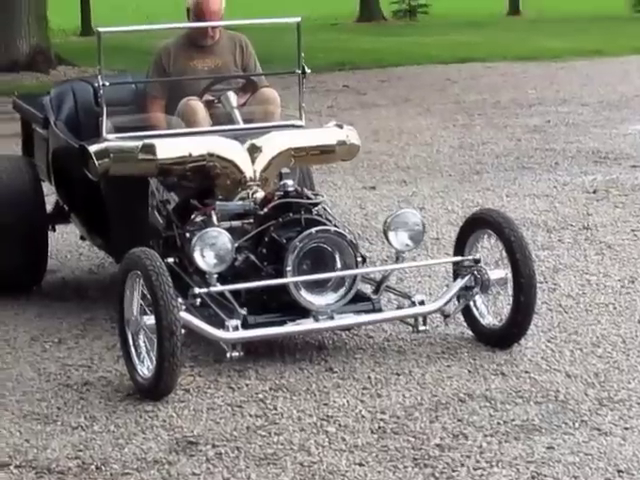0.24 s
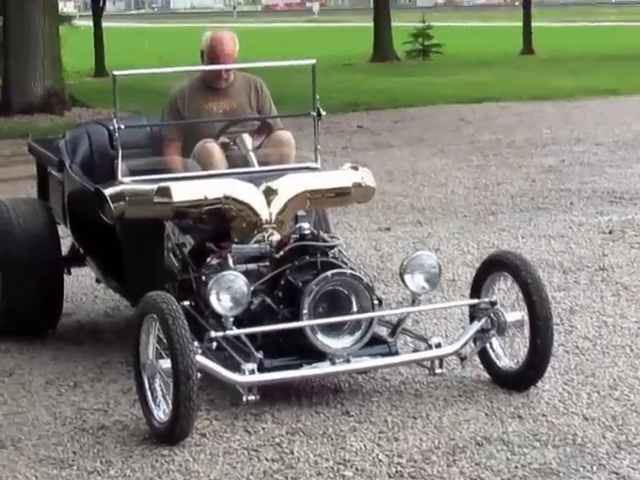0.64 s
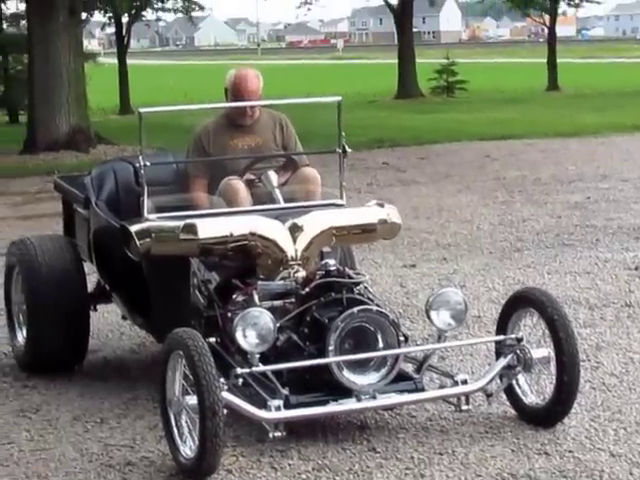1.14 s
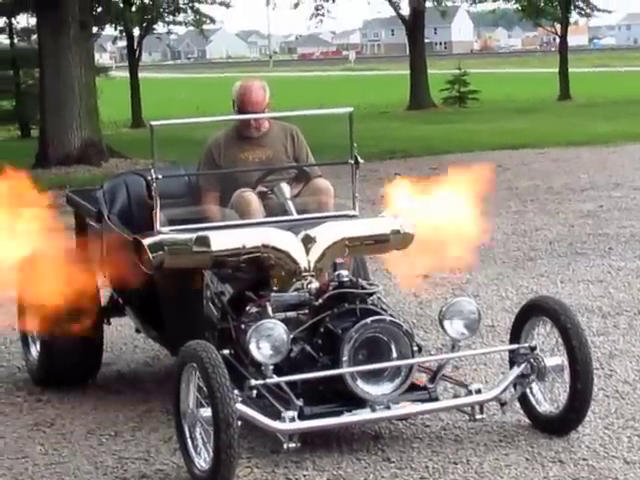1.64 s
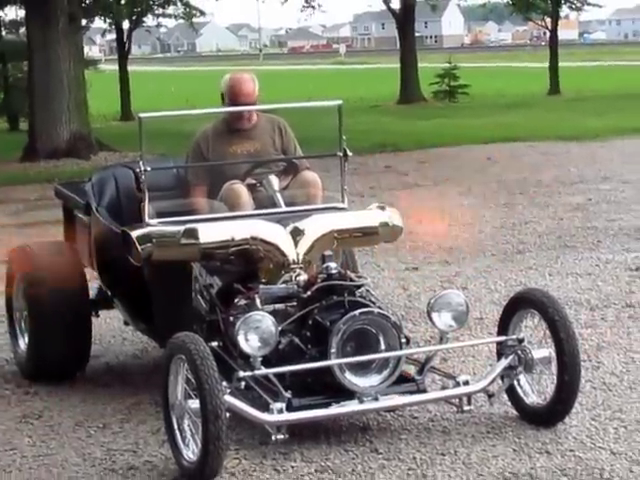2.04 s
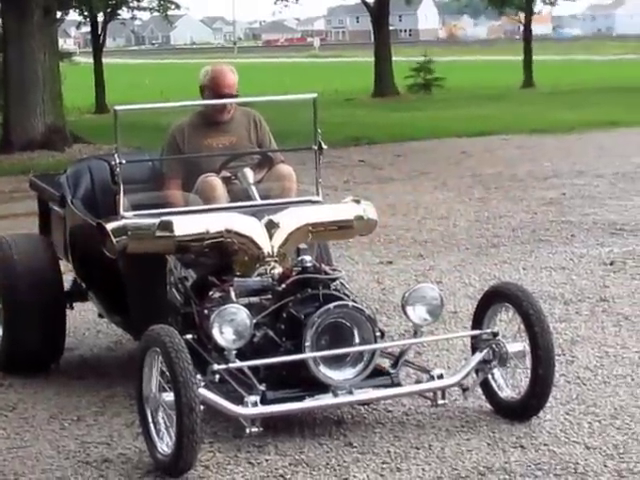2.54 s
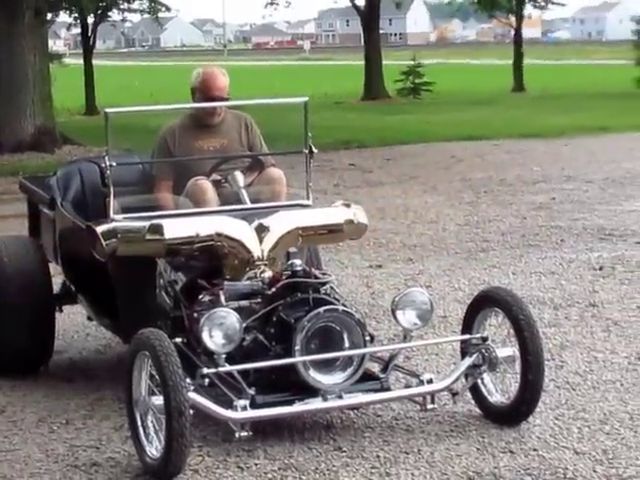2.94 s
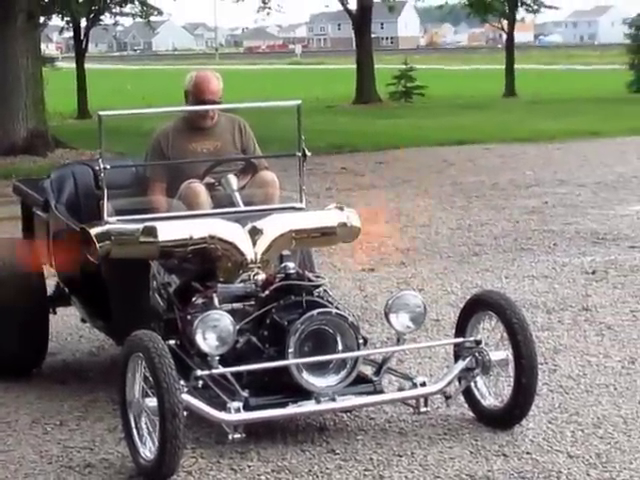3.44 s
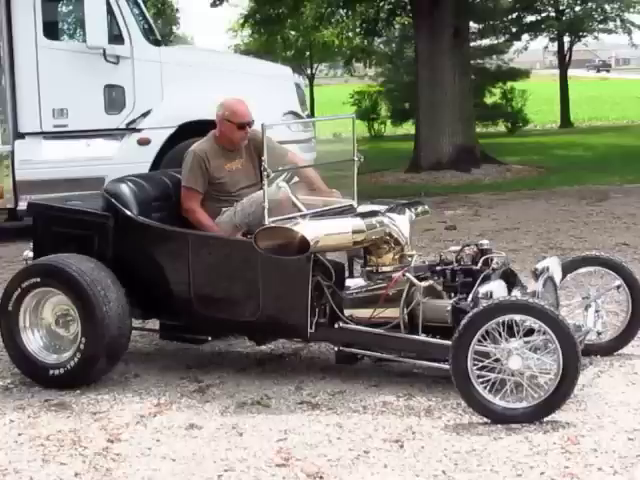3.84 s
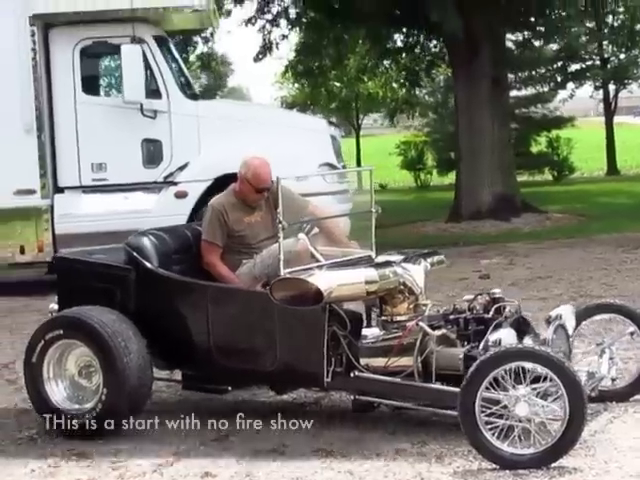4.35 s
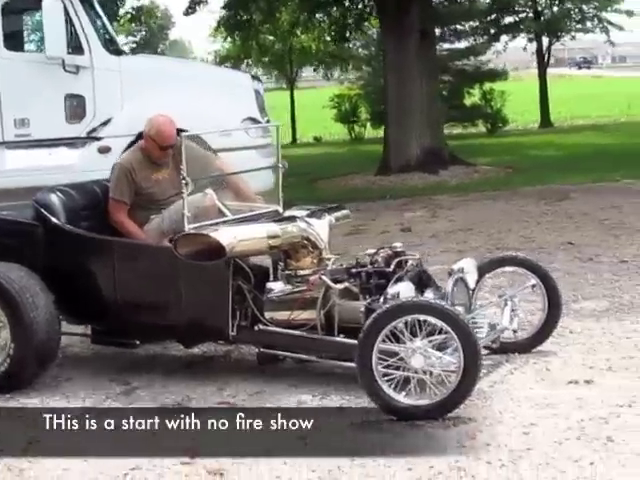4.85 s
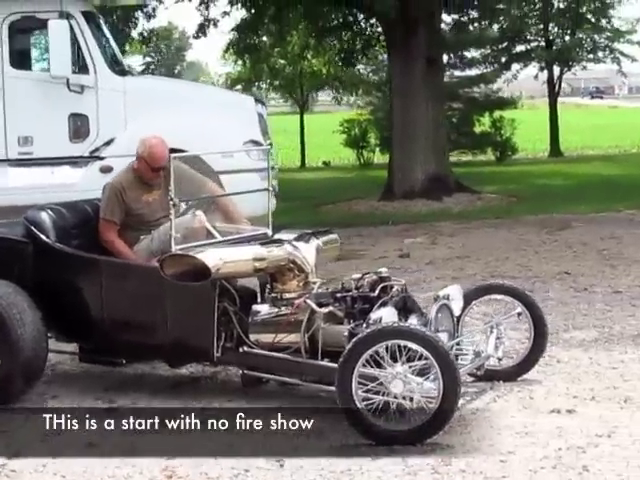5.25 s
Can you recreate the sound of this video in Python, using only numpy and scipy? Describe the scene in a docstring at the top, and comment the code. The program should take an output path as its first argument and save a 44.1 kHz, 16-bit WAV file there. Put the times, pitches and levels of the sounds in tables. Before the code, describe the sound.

A small turbine engine whines over a booming exhaust and flares with fluttering flames, then gives way to clicks and a starter whirring up.

```python
"""Outdoors on gravel, a small gas turbine runs in an open hot rod. Its spinning compressor blades whine and
slow down over a booming exhaust and a rush of gas. At 1.5 s the fuel lights, the pipes drone, and the whine
flutters with the flames as it climbs again. At 3.9 s the scene changes to a quiet yard: a few clicks, then the
starter clacks in and its gear teeth whir faster and faster."""
import sys
import numpy as np
from scipy import signal
from scipy.fft import rfft, irfft
from scipy.io import wavfile
from scipy.ndimage import uniform_filter1d

SR = 44100
rng = np.random.default_rng(int(sys.argv[2]) if len(sys.argv) > 2 else 0)


def generate_wav(sig):
    """Save sig (samples, or channels by samples) to the path in sys.argv[1] as 16-bit PCM at SR."""
    pcm = np.round(np.clip(np.atleast_2d(sig).T, -1, 1) * 32767).astype(np.int16)
    wavfile.write(sys.argv[1], SR, pcm)


N = 242991
T = np.arange(N) / SR
HZ = np.fft.rfftfreq(N, 1 / SR)
LIGHT_S, LIGHT_RISE_S = 1.465, .1  # when the fuel lights, and how long it takes

# How fast the compressor blades pass. Each row: time in seconds, rate in Hz.
BLADE_RATE = [(0.0, 2715), (0.25, 2600), (0.5, 2516), (1.0, 2368), (1.45, 2262), (1.8, 2364), (2.0, 2404),
              (2.55, 2519), (2.9, 2556), (3.3, 2633), (3.45, 2697), (3.9, 2905)]
# How well the intake lets the whine out. Each row: frequency in Hz, level in dB.
INTAKE_RESPONSE = [(2250, -29), (2480, -31.5), (2680, -28.3), (2860, -21), (4480, -34), (4650, -24.3),
                   (5800, -24), (6800, -43), (7120, -38.5), (7350, -23.3), (7800, -26.5), (8150, -21.7),
                   (8700, -27), (9100, -39), (10400, -35.5), (11400, -42), (12100, -38), (13200, -36.5),
                   (13700, -42), (15000, -54)]
# One tone of the whine swells or sinks. Each row: time in seconds, harmonic number, change in dB,
# half length in seconds.
WHINE_SWELLS = [(.33, 1, 6.5, .1), (.1, 1, -6, .06), (.73, 2, -10, .025), (1.15, 2, 2.5, .1),
                (1.56, 2, -5, .11), (2.58, 3, 5, .14), (3.2, 2, -3, .15), (3.53, 1, 3, .1),
                (3.785, 1, 3.5, .03)]
# The tone colour of each noise. Each row: frequency in Hz, relative level in dB.
BOOM_COLOUR = [(40, -70), (85, -17), (115, -12), (138, -2), (152, -1), (175, -8.5), (215, -13.5),
               (290, -30), (420, -30.5), (560, -36), (680, -29.5), (850, -36.5), (2000, -60.5)]
RUMBLE_COLOUR = [(15, -22), (30, -19), (52, 0), (80, 3.5), (120, -2.5), (220, -4), (300, -12), (450, -17),
                 (900, -32), (2000, -63.5)]
ROAR_COLOUR = [(100, 4.5), (400, -2), (700, -3.7), (1050, -2.8), (1450, 3.5), (2000, 0.5), (2700, 5.3),
               (3300, -3.5), (6000, -33.5)]
HISS_COLOUR = [(1200, -19), (2500, -11), (3700, .6), (5500, 3.3), (6700, -1.7), (8500, 2.2), (11000, -3),
               (13000, -2.5), (14500, -15), (16000, -50)]
YARD_COLOUR = [(15, -26), (30, 2.5), (110, 3), (200, -3), (360, -9), (560, -11.5), (1200, -14), (1800, -17),
               (2600, -21.5), (3300, -21.5), (4200, -27.5), (5600, -29), (9700, -37.5), (15000, -46.5)]
RATTLE_COLOUR = [(200, -22), (350, -9.5), (520, 3), (700, -4), (900, 3.5), (1250, -1.5), (2000, -0.5),
                 (2800, -5.5), (3300, -13), (4300, -13.5), (6000, -18), (9500, -13.5), (12000, -24.5),
                 (15000, -43)]
# The boom surges. Each row: time in seconds, pitch in Hz, level in dB, half length in seconds.
BOOM_SURGES = [(0.131, 146.5, -7.5, 0.0072), (0.168, 142, -9.5, 0.0066), (0.209, 155.7, -10, 0.0064),
               (0.239, 140, -7.5, 0.00715), (0.46, 148.9, -6.5, 0.01515), (0.787, 141, -11, 0.0109),
               (0.847, 140.7, -9.5, 0.0149), (0.917, 159.3, -8, 0.0148), (1.246, 165.1, -10, 0.012),
               (1.471, 152.9, -11, 0.0092), (1.504, 123.2, -8, 0.0108)]
# The boom sags. Each row: time in seconds, change in dB.
BOOM_LULLS = [(0.351, -5.5), (.54, -2.5), (.675, -5), (1.14, -4.5), (1.33, -2.5), (3.01, -4.5)]
# Bursts of flame. Each row: start and end in seconds, extra whine flutter in radians,
# rumble boost in dB, boom loss in dB.
FLAME_BURSTS = [(1.47, 1.842, .27, 10.8, 14.5), (1.838, 2.48, .31, 8, 8), (2.72, 2.95, .36, 4.5, -1),
                (3.34, 3.61, 0.425, 5, 11.5), (3.7, 3.95, 0.359, 3.5, 10)]
# The flames spit. Each row: time in seconds, boost to the rush in dB, half length in seconds.
FLAME_SPITS = [(1.539, 0, 0.0035), (1.722, 2.5, 0.0084), (1.778, 1, 0.0043), (2.007, 6, 0.0131),
               (2.056, 4.5, 0.01), (2.18, 3, 0.013), (2.211, 11.5, 0.00343), (2.274, 3.5, 0.0039),
               (2.314, 6, 0.0052)]
# How the exhaust pipes, engine mount and gear case ring. # Each row: pitch in Hz, width in Hz between the half-
# power points, relative strength in dB.
PIPE_MODES = [(118, 22, 0), (254, 22, -2.5), (425, 36, -13)]
MOUNT_MODES = [(874, 70, -7), (1170, 300, -1.5), (1760, 150, -6), (1987, 300, 2), (2750, 300, 3.5),
               (3450, 150, -8), (4350, 450, 1), (5100, 600, -3), (7410, 1220, -7.5)]
CASE_MODES = [(352.6, 25, 1.5), (828.7, 15.7, 6.5), (926, 52, -6.5), (1848, 19, 1), (1980, 31.5, 5.5),
              (2085, 41, -5), (2744, 54, -2.5), (2890, 37, -20), (4040, 105, -11)]
# Knocks, a puff of air and the starter's clack. Each row: start in seconds, level in dB, centre in Hz,
# width in octaves, seconds for the crack to fall 60 dB, tail level against the crack in dB,
# seconds for the tail to fall 60 dB, share of mount ringing from 0 to 1.
KNOCKS = [(4.4588, -18.5, 1520, 0.42, 0.034, -19.5, 0.42, 0.1),
          (4.46, -34.5, 7200, .9, 0.0255, -6, 0.6, 0.58), (4.4995, -33, 3100, 0.55, 0.038, -6, 0.22, 0.1),
          (4.7316, -27, 6700, 0.7, 0.0305, -4, 0.357, 0.03),
          (4.8797, -14.7, 7000, 0.54, 0.0125, -17.5, 0.46, 0.1),
          (4.9150, -11.7, 4450, 0.7, 0.0715, -9, 0.42, .85), (4.965, -39, 190, 1.0, 0.29, 1, 0.81, .02)]
# Light ticks. Each row: start in seconds, level in dB.
LIGHT_TICKS = [(3.951, -23), (3.9949, -24.2), (4.0144, -32), (4.0587, -20.5), (4.124, -36), (4.6025, -29)]
# The sound all ticks share: the last six columns of a knock.
TICK_SOUND = (5000, .62, .006, -27, 0.18, 0.08)
# How loud the starter is. Each row: time in seconds, level in dB.
STARTER_LOUDNESS = [(4.925, -32), (4.98, -38), (5.1, -38), (5.2, -32.5), (5.3, -31.5), (5.4, -28),
                    (5.52, -28.5)]
# How fast its gear teeth meet. Each row: time in seconds, rate in Hz.
TOOTH_RATE = [(4.92, 246), (5.05, 596), (5.2, 790), (5.33, 880), (5.52, 975)]
# Which side a sound leans to. Each row: frequency in Hz, left minus right in dB.
TURBINE_BALANCE = [(60, 4), (110, 1), (200, 0.0), (380, -1.5), (700, 0.0), (1290, -2.5), (2380, -4),
                   (4400, 0.5), (8120, 4), (15000, -3)]
YARD_BALANCE = [(60, 3.5), (110, -0.5), (200, 0.5), (380, -1), (700, -1.5), (1290, -2.5), (2380, -3.0),
                (4400, 2), (8120, 1), (15000, 0.5)]
# How far the engine's left side runs ahead. Each row: frequency in Hz, phase lead in radians.
LEFT_LEAD = [(30, -1.24), (75, -0.94), (150, -0.4), (330, 0.21), (1300, -0.34), (4000, 0.086)]
# How alike left and right are. Each row: frequency in Hz, likeness from 0 to 1.
TURBINE_LIKENESS = [(50, 0.875), (130, 1), (300, 0.822), (700, 0.713), (2000, 0.794), (12000, 0.777)]
YARD_LIKENESS = [(50, 0.25), (150, 0.55), (700, 0.7), (1500, 0.75), (3000, 0.338), (12000, 0.356)]
# The bass cut after the microphone. Each row: frequency in Hz, gain in dB.
BASS_CUT = [(60, -9), (160, -5.5), (450, -2.5), (1000, 2)]


def amp(db):
    """Turns decibels into a gain."""
    return 10 ** (np.asarray(db) / 20)


def unit(x):
    """Scales a signal to an average (rms) strength of 1."""
    return x / np.sqrt(np.mean(x ** 2) + 1e-20)


def over_time(rows):
    """Joins a table's points into a value for every sample."""
    times, values = np.transpose(rows)
    return np.interp(T, times, values)


def over_hz(rows):
    """Joins a table's points into a value for every frequency."""
    hz, values = np.transpose(rows)
    return np.interp(np.log(HZ + 1), np.log(hz + 1), values)


def bell(s, half_length):
    """A smooth swell of height 1 around one moment."""
    return np.exp(-((T - s) / half_length) ** 2)


def ramp(start, length):
    """Rises from 0 to 1 and stays there."""
    return np.clip((T - start) / length, 0, 1)


def band(hz, octaves):
    """A bell-shaped band of frequencies."""
    return np.exp(-.5 * (np.log2((HZ + 1) / hz) / octaves) ** 2)


def wobble(hz, octaves):
    """A random wiggle of strength 1 around one rate."""
    return unit(irfft(rfft(rng.standard_normal(N)) * band(hz, octaves), N))


def noise(gain, likeness=TURBINE_LIKENESS):
    """Filtered stereo noise of strength 1, partly alike left and right."""
    common, apart = rfft(rng.standard_normal((2, N)))
    alike = np.clip(over_hz(likeness), 0, 1)
    mid, side = common * np.sqrt(1 + alike), apart * np.sqrt(1 - alike)
    return unit(irfft(np.array([mid + side, mid - side]) * gain, N))


def resonance(modes):
    """How strongly a ringing body answers each frequency."""
    return abs(sum(amp(db) / (1 + 2j * (HZ - hz) / width) for hz, width, db in modes))


def lean(x, balance, lead=((0, 0),)):
    """Tilts each frequency to the left or right, in level and in phase."""
    half = np.array([[.5], [-.5]])
    return irfft(rfft(x) * amp(half * over_hz(balance)) * np.exp(1j * half * over_hz(lead)), N)


def reflect(x, echo_db, spread_s, count=14):
    """Adds short echoes from ground and bodywork, different on each side."""
    delay = rng.random((2, count))
    taps = np.zeros((2, SR // 4))
    arrival = np.clip(delay * spread_s * SR, 1, SR // 4 - 1).astype(int)
    echoes = rng.choice([-1, 1], (2, count)) * np.exp(-2 * delay)
    np.put_along_axis(taps, arrival, echoes, 1)
    taps *= amp(echo_db) / np.linalg.norm(taps, axis=1, keepdims=True)
    taps[:, 0] = 1  # the direct sound
    return signal.oaconvolve(x[None], taps, axes=1)[:, :N] / np.linalg.norm(taps[0])


def compressor_whine(flame, duct, flutter):
    """Passing blades make a stack of tones; pressure swings shake them and swirling air roughens them."""
    blade_hz = over_time(BLADE_RATE)
    phase = 2 * np.pi * np.cumsum(blade_hz) / SR
    shaken = phase - flutter * flame + .049 * duct + .245 * wobble(7.2, .83)
    eddy_colour = 1 / (1 + (HZ / 130) ** 2) ** .78 / (1 + (HZ / 700) ** 4)
    out = np.zeros((2, N))
    for k in range(1, 7):  # harmonic k sounds at k times the blade rate
        db = np.interp(k * blade_hz, *np.transpose(INTAKE_RESPONSE))
        db -= .3 * k * ramp(LIGHT_S, LIGHT_RISE_S)
        db += sum(gain * bell(s, length) for s, harmonic, gain, length in WHINE_SWELLS if harmonic == k)
        throb = amp(3 * np.sqrt(k) * flutter * flame)  # higher tones throb more
        throb /= np.sqrt(uniform_filter1d(throb ** 2, size=4000))
        roughness = amp(-10) * (1 + 3.68 * np.sqrt(k) * flutter)
        eddies = (noise(eddy_colour) + 1j * noise(eddy_colour)) / np.sqrt(2)
        rough = (1 + roughness * eddies) / np.sqrt(1 + roughness ** 2)
        # moving hot air makes each tone shift between the ears and fade
        drift = np.outer([.5, -.5], .55 * wobble(3.3, 1))
        level = throb * amp(db + 1.4 * wobble(5.59, 1))
        out += level * np.sqrt(2) * (rough * np.exp(1j * (k * shaken + drift))).real
    accessory_gear = amp(-44) * np.sin(.571 * phase)  # driven by the same shaft
    return out + accessory_gear


def exhaust_boom(choke_db, steadiness=.606):
    """The exhaust duct sings near 150 Hz until flames choke it; in a surge it locks onto one pitch."""
    pressure = noise(amp(over_hz(BOOM_COLOUR)))
    strength = np.sqrt(abs(uniform_filter1d(pressure[0] ** 2, size=1400)) + 1e-6)
    lull_db = sum(db * bell(s, half_length=.032) for s, db in BOOM_LULLS)
    level_db = -16 - ramp(LIGHT_S, LIGHT_RISE_S) + lull_db - choke_db
    out = amp(level_db) * unit(pressure / strength ** steadiness)
    for s, hz, db, length in BOOM_SURGES:
        share = bell(s, length)
        tone = np.exp(2j * np.pi * hz * T)
        in_step = np.exp(1j * np.angle(np.sum(share * out[0] / tone)))  # lines up with the boom
        out = out * (1 - share) + share * amp(db) * np.sqrt(2) * (tone * in_step).real
    return out


def exhaust_rumble(boost_db):
    """A deep, lumpy noise that grows with each burst of flame."""
    lumps_db = 2.0642 * wobble(6.48, .97)
    return amp(-30 + boost_db + lumps_db) * noise(amp(over_hz(RUMBLE_COLOUR)))


def gas_rush(flame, duct, flutter):
    """Jet roar and intake hiss grow with the gas flow, pulse with the pressure and spit briefly."""
    pulse_db = (.5 + .244 * flutter) * flame + 1.18 * duct
    pulse_db += (.5 + 1.35 * flutter) * wobble(95, 1.58)
    gust_db = .64 * wobble(7.8, 1.61)
    spit_db = sum(db * bell(s, length) for s, db, length in FLAME_SPITS)
    lit, seconds_lit = ramp(LIGHT_S, LIGHT_RISE_S), np.maximum(T - LIGHT_S, 0)
    roar = amp(-34.5 + 4.5 * lit + 2 * seconds_lit) * noise(amp(over_hz(ROAR_COLOUR)))
    hiss = amp(-34 + 3 * lit + 1.9334 * seconds_lit) * noise(amp(over_hz(HISS_COLOUR)))
    return (roar + hiss) * amp(pulse_db + gust_db + spit_db)


def flame_throb():
    """The flame throbs at an uneven rate, with nearly constant strength."""
    swing = signal.hilbert(wobble(hz=48, octaves=.413))
    return unit(swing.real / (abs(swing) + .1) ** .59)


def flame_bursts(edge_s=.063, choke_lag_s=.03):
    """Each burst shakes the whine, boosts the rumble and, a moment later, usually chokes the boom."""
    flutter, boost_db, choke_db = sum(np.outer(effects, ramp(start, edge_s) - ramp(end, edge_s))
                                      for start, end, *effects in FLAME_BURSTS)
    steady_flutter = .03 + .14 * ramp(LIGHT_S, LIGHT_RISE_S)
    return steady_flutter + flutter, boost_db, np.interp(T - choke_lag_s, T, choke_db)


def pipe_drone(boost_db):
    """Once the fuel is lit, the flames make the exhaust pipes ring."""
    return amp(-30 + .45 * boost_db) * ramp(LIGHT_S, LIGHT_RISE_S) * noise(resonance(PIPE_MODES) ** 1.5)


def turbine():
    """The whole engine, its sounds tied together by the flames and the pressure in the duct."""
    flutter, boost_db, choke_db = flame_bursts()
    flame, boom = flame_throb(), exhaust_boom(choke_db)
    duct = unit(boom[0])
    exhaust = boom + exhaust_rumble(boost_db) + pipe_drone(boost_db)
    engine = exhaust + gas_rush(flame, duct, flutter) + compressor_whine(flame, duct, flutter)
    return lean(engine, TURBINE_BALANCE, LEFT_LEAD)


def yard_noise():
    """The soft, low background of the open yard."""
    return amp(-36.5) * noise(amp(over_hz(YARD_COLOUR)), YARD_LIKENESS)


def clicks(rise_s=.0002533, contact_db=3):
    """Each click is a sharp contact, a short crack and a softer tail; some ring the engine mount."""
    out = np.zeros((2, N))
    mount = unit(resonance(MOUNT_MODES) ** 1.47)
    ticks = [(*tick, *TICK_SOUND) for tick in LIGHT_TICKS]
    for s, db, hz, octaves, crack_s, tail_db, tail_s, ring in ticks + list(KNOCKS):
        age = np.maximum(T - s, 0)
        decay = np.hypot(amp(-60 * age / crack_s), amp(tail_db - 60 * age / tail_s))
        colour = np.sqrt((1 - ring) * unit(band(hz, octaves)) ** 2 + ring * mount ** 2)
        contact = irfft(colour * np.exp(-2j * np.pi * HZ * (s + 2 * rise_s)), N)  # a single pulse
        crack = (1 - np.exp(-age / rise_s)) * decay * noise(colour, YARD_LIKENESS)
        out += amp(db) * (crack + amp(contact_db) * contact / abs(contact).max())
    return out


def starter_whir(jitter=.0134, flicker_db=5.5):
    """Gear teeth rattle and meet ever faster; their tones sweep through the ringing of the gear case."""
    tooth_hz = over_time(TOOTH_RATE) * (1 + jitter * wobble(39, .83))
    phase = 2 * np.pi * np.cumsum(tooth_hz) / SR
    teeth = sum(np.cos(k * phase) * amp(flicker_db * wobble(8.4, .58)) for k in range(1, 4))
    case = resonance(CASE_MODES)
    tones = .825 * irfft(rfft(teeth) * (case ** .85 + .33), N)
    ring = noise(case ** 1.145, YARD_LIKENESS)
    rattle = noise(amp(over_hz(RATTLE_COLOUR)), YARD_LIKENESS) * amp(.94 * wobble(90, 1))
    whir = amp(-6) * reflect(tones, echo_db=-7.5, spread_s=.03) + amp(-4) * ring + amp(-2.4) * rattle
    running = T > STARTER_LOUDNESS[0][0]
    return whir * amp(over_time(STARTER_LOUDNESS)) * running


def scene():
    """The running turbine fades out; the quiet yard fades in, with its clicks and the starter."""
    yard = lean(yard_noise() + starter_whir() + clicks(), YARD_BALANCE)
    fade_out = np.interp(T, (3.865, 3.938), (1, 0)) ** 1.61
    fade_in = np.interp(T, (3.922, 4.031), (0, 1)) ** .926
    return turbine() * fade_out + yard * fade_in


def record(dry, ceiling=.621, top_hz=15650):
    """The loudest bass overloads the microphone ahead of its bass cut; the highest treble is removed."""
    bass_cut = amp(over_hz(BASS_CUT))
    pressure = irfft(rfft(dry) / bass_cut, N)  # the sound with its full bass
    rounded = pressure / (1 + (pressure / ceiling) ** 10) ** (1 / 10)
    out = irfft(rfft(rounded) * bass_cut, N)
    treble_cut = signal.firwin(511, top_hz, window=("kaiser", 9), fs=SR)
    return signal.oaconvolve(out, treble_cut[None], "same")


dry = scene()
out = record(dry)
generate_wav(out)
```